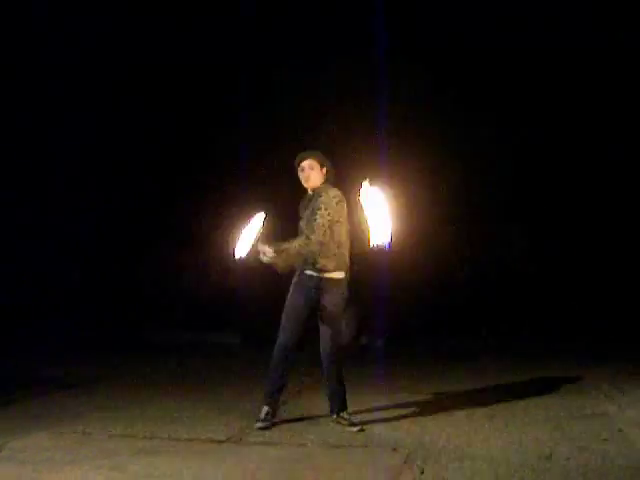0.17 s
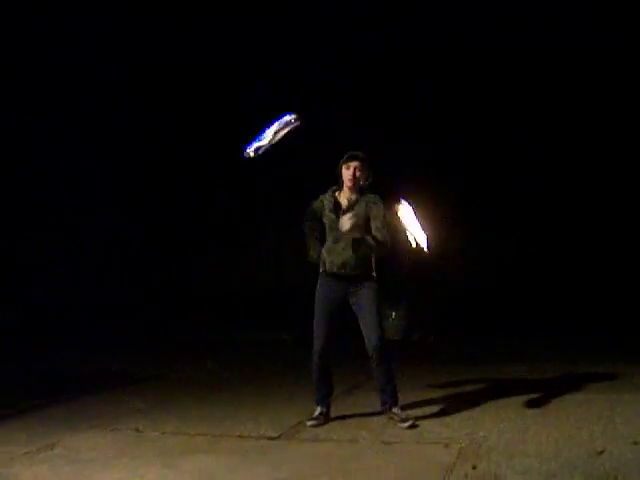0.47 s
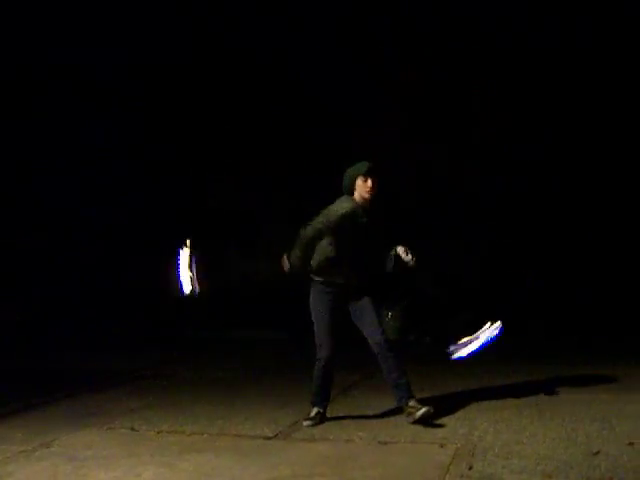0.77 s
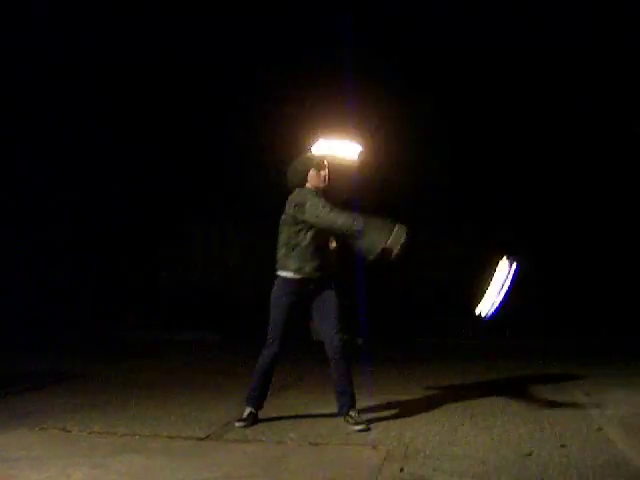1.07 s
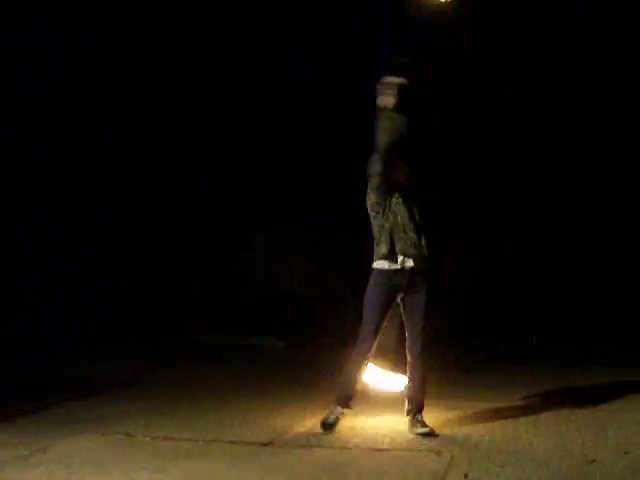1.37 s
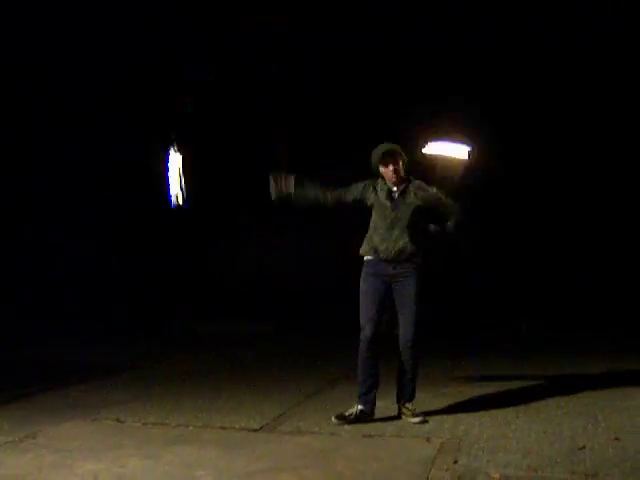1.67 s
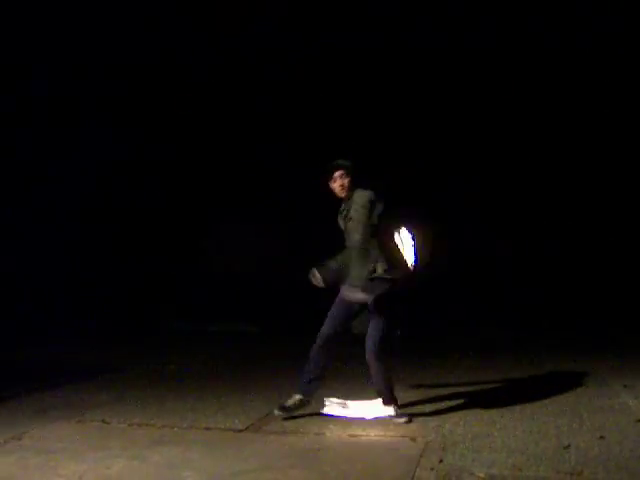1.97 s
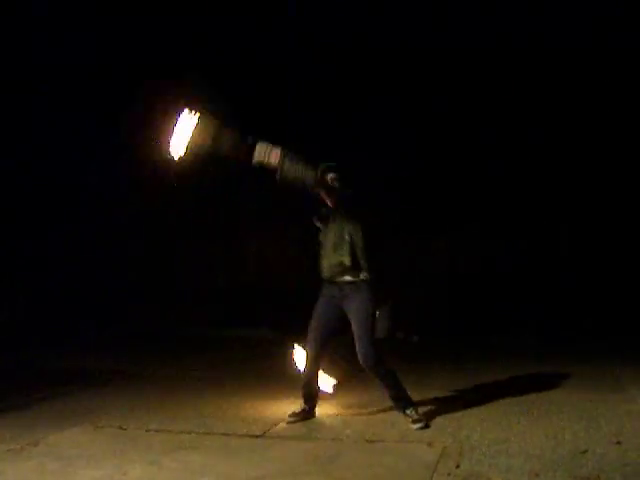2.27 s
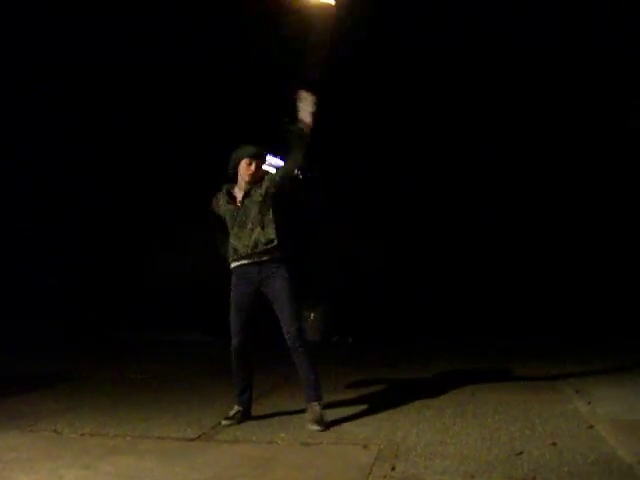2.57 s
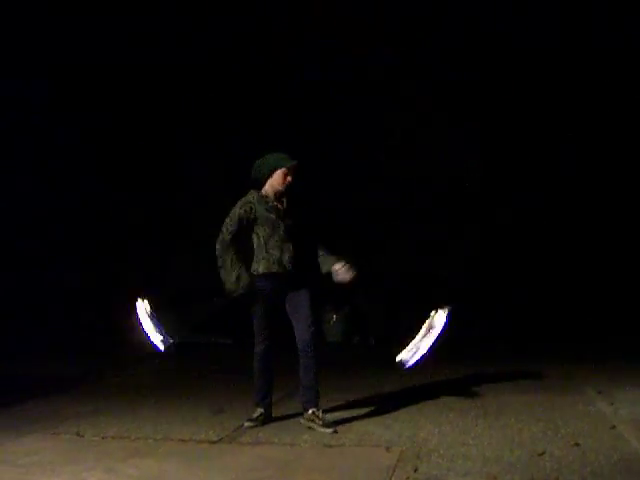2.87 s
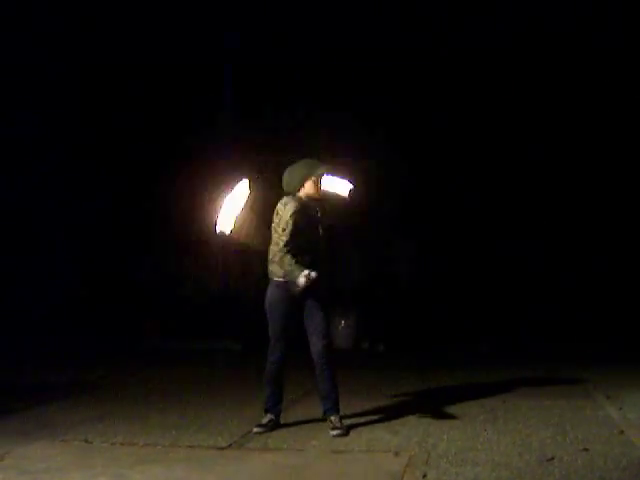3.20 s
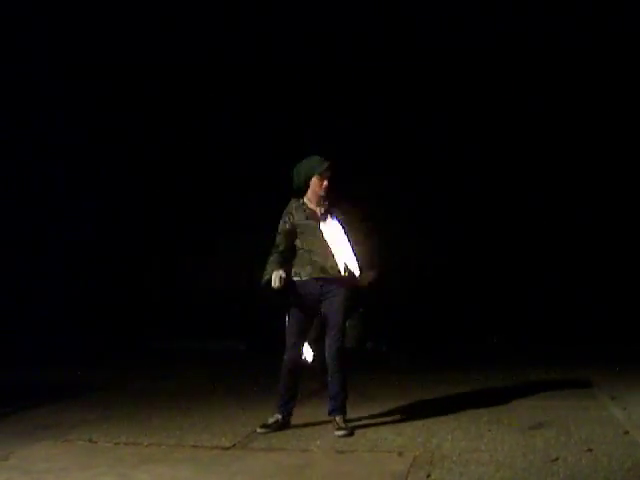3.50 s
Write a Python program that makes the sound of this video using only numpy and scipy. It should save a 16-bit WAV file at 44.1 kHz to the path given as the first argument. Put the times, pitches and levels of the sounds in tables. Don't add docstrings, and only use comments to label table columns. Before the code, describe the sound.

Burning poi swing in circles, flames roaring and whooshing in overlapping surges outdoors at night

```python
import sys
import numpy as np
from scipy import signal
from scipy.fft import rfft, irfft, next_fast_len
from scipy.io import wavfile
from scipy.ndimage import uniform_filter1d, map_coordinates

SR = 44100
rng = np.random.default_rng(int(sys.argv[2]) if len(sys.argv) > 2 else 0)


def elevation(decibels):
    levels = np.asarray(decibels, float)
    return 10 ** (levels / 20)


def bounce(signal):
    frames = np.transpose(np.atleast_2d(signal))
    limited = np.clip(frames, -1, 1)
    pcm = np.round(limited * 32767).astype(np.int16)
    wavfile.write(sys.argv[1], SR, pcm)


N = 160524
TIME = np.arange(N) / SR


def unit(x):
    return x / np.sqrt(np.mean(x ** 2) + 1e-20)


def along(points, hz):
    f, value = np.transpose(points)
    return np.interp(np.log(hz + 1), np.log(f + 1), value)


def wobble(rate):
    return map_coordinates(rng.standard_normal(N // 40), [TIME * rate + 2])


def filtered(x, response):
    size = next_fast_len(N + 8192)
    return irfft(rfft(x, size) * response(np.fft.rfftfreq(size, 1 / SR)), size)[..., :N]


def band(hz, width_hz):
    return lambda f: (1j * f * width_hz / (hz * hz - f * f + 1j * f * width_hz)) ** 2


def gate(start, length, edge):
    return np.clip(np.minimum(TIME - start, start + length - TIME) / edge, 0, 1)


def rush(spectrum, lumps, patchy_db):
    patches = signal.stft(rng.standard_normal(N) * lumps, nperseg=512)[2]
    field = uniform_filter1d(rng.standard_normal(patches.shape), size=6, axis=0)
    field = uniform_filter1d(field, size=10, axis=1)
    air = signal.istft(patches * elevation(patchy_db * unit(field)), nperseg=512)[1][:N]
    return unit(filtered(air, lambda hz: elevation(along(spectrum, hz))))


# frequency in Hz, density in dB per Hz.
NIGHT = [(15, -30), (25, -2), (60, -0.5), (300, -17), (800, -21), (5020, -46.5), (8000, -52.5), (9200, -89)]
# centre in Hz, width in Hz, level in dB.
DRONES = [
    (44, 15, -37.5),
    (139, 26, -33.5),
    (295, 14, -39),
    (750, 93, -46),
]
NIGHT_DB = -22.5


def night():
    drones = np.zeros(N)
    for hz, width_hz, db in DRONES:
        drones += elevation(db) * unit(filtered(rng.standard_normal(N), band(hz, width_hz)))
    drift, lumps = elevation(.4 * wobble(2.5)), elevation(.6 * wobble(9))
    return drift * (elevation(NIGHT_DB) * rush(NIGHT, lumps, patchy_db=0.58) + drones)


# start in seconds, length in seconds, level in dB.
CHIRPS = [
    (.0, .1, -59),
    (.37, .17, -56),
    (.78, .16, -54),
    (1.24, .18, -57),
    (1.65, .2, -56),
    (2.03, .1, -57),
    (2.4, .16, -56),
    (2.78, .2, -54),
    (3.12, .2, -56),
    (3.54, .12, -58),
]
WING_HZ, WING_WIDTH_HZ = 5050, 65
STROKE_RATE, STROKE_DEPTH = 55, .6


def cricket():
    wing = lambda f: np.exp(-((f - WING_HZ) / WING_WIDTH_HZ) ** 2)
    strokes = 1 + STROKE_DEPTH * np.sin(2 * np.pi * STROKE_RATE * TIME)
    song = sum(elevation(db) * gate(start, length, 0.021) for start, length, db in CHIRPS)
    return unit(filtered(rng.standard_normal(N), wing)) * strokes * song


# time in seconds, level in dB, centre in Hz, width in Hz.
TICK = (2.1275, -34, 3300, 2200)


def chain():
    start, db, hz, width_hz = TICK
    blow = np.zeros(N)
    blow[round(start * SR)] = 1
    return elevation(db) * unit(filtered(blow, band(hz, width_hz))) * np.sqrt(.002 * SR / N)


# start in seconds, length in seconds, level in dB, centre in Hz, width in Hz.
SCRAPES = [
    (1.058, .03, -38, 3200, 2500),
    (2.006, 0.0035, -38, 3600, 1000),
    (2.0235, .008, -32, 4000, 1100),
    (2.0235, .007, -35.5, 6300, 5000),
    (2.0315, .003, -38, 4500, 5000),
    (2.0335, .003, -34, 5500, 6000),
    (2.034, .013, -33.5, 3600, 2200),
    (2.026, .023, -32, 1700, 2000),
    (2.037, .01, -42, 6500, 4000),
    (2.048, .0045, -33.5, 5000, 8000),
]
GRIT_RATE, GRIT_SPREAD_DB = 2200, 3


def scrapes():
    out = np.zeros(N)
    for start, length, db, hz, width_hz in SCRAPES:
        chance, side, size = rng.random((3, N))
        clicks = (chance < GRIT_RATE / SR) * np.sign(side - .5)
        grit = clicks * elevation(-GRIT_SPREAD_DB * np.log(size + .05))
        burst = (grit + 0.63 * rng.standard_normal(N)) * gate(start, length, 0.00064)
        out += elevation(db) * unit(filtered(burst, band(hz, width_hz))) * np.sqrt(length * SR / N)
    return out


def puffs(rows, sharpness):
    out, noise = np.zeros(N), rng.standard_normal((len(rows), SR // 4))
    for (start, length, db, hz), air in zip(rows, noise):
        progress = np.clip(np.arange(len(air)) / SR / length, 0, 1)
        swell = np.sin(np.pi * progress) * air
        first = round(start * SR)
        burst = np.zeros(N)
        burst[first:][:len(air)] = swell[:N - first]
        out += elevation(db) * unit(filtered(burst, band(hz, hz / sharpness))) * np.sqrt(length * SR / N)
    return out


# start in seconds, length in seconds, level in dB, centre in Hz.
SPITS = [(.608, 0.0073, -31, 1340), (1.03, 0.012, -32.5, 1250), (1.055, 0.017, -29, 870),
         (1.06, 0.021, -33, 1970), (1.066, 0.013, -36, 2660), (1.075, 0.011, -34, 1630),
         (1.094, .012, -38, 2120), (1.101, .01, -37, 3000), (1.116, .012, -41, 1960),
         (1.128, 0.027, -31, 1140), (1.14, .016, -41, 2820), (1.654, 0.012, -44, 2070),
         (2.792, 0.0062, -37, 1970), (2.83, 0.012, -40, 2150), (2.867, 0.013, -30, 1350),
         (2.875, .012, -38, 3300), (2.877, 0.009, -34.5, 2000), (2.942, 0.0077, -42, 2500),
         (2.957, 0.0086, -43, 2650)]


def spits():
    return puffs(SPITS, sharpness=8.3)


# start in seconds, length in seconds, level in dB, centre in Hz.
WHIRLS = [(.17, 0.089, -31.5, 850), (.21, 0.041, -28, 295), (.32, 0.044, -23, 220), (.4, .08, -27.5, 127.5),
          (.52, 0.079, -34, 450), (.64, 0.078, -27, 139), (.78, .1, -26, 109.5), (1.12, 0.089, -26.5, 138),
          (1.24, .12, -25.5, 124.6), (1.35, 0.055, -30, 290), (2.0, .05, -22.5, 151),
          (.7, 0.095, -25.5, 235), (.74, .16, -28, 222), (.73, 0.18, -28, 310), (.8, 0.089, -25, 360),
          (.86, 0.079, -22.5, 200), (.93, 0.063, -25, 228), (1.28, 0.028, -26.5, 293),
          (1.48, 0.076, -33, 750), (1.73, 0.087, -29.5, 160), (1.83, 0.06, -29.5, 340),
          (1.95, 0.087, -26, 250), (2.245, 0.027, -25, 81.2), (2.265, 0.028, -26.5, 288),
          (2.305, 0.036, -24.5, 286), (2.78, 0.1, -34, 800), (2.86, 0.042, -26, 260),
          (2.85, 0.2, -27.5, 208), (2.87, 0.16, -29.5, 138), (2.95, 0.051, -21, 213),
          (3.23, 0.034, -21.5, 160), (3.23, 0.094, -33, 750), (3.31, 0.034, -22, 205),
          (3.4, 0.034, -19.5, 290), (3.5, 0.079, -28, 300)]


def whirls():
    return puffs(WHIRLS, sharpness=2.64)


def swing(rows):
    seconds, height = np.transpose(rows)
    turns = np.arange(len(seconds))
    place = np.interp(TIME, seconds, turns)
    eased = np.floor(place) + (1 - np.cos(np.pi * (place % 1))) / 2
    return np.interp(eased, turns, height)


# frequency in Hz, density in dB per Hz.
ROAR = [(40, -120), (90, -14.5), (170, 1), (300, 1), (400, -1.5), (520, -12.5), (900, -14), (2000, -120)]
BODY = [(200, -120), (450, -6), (850, -2.5), (1400, -8.5), (2500, -26.5), (6000, -120)]
HISS = [(500, -120), (1100, -15.5), (2000, -1.5), (4000, -8), (7000, -18), (8200, -17.5), (9100, -50)]
ROAR_DB, BODY_DB, HISS_DB = -30, -38.5, -42.5
ROAR_GROWS, BODY_GROWS, HISS_GROWS = 1.17, 0.79, 1.08
FLUTTER_DB, FLUTTER_RATE = 1.5, 13
TEAR_DB, TEAR_RATE = 1.5, 150
ECHO_MS_PER_M, GROUND_SHARE = 1.25, .8
BLUR_HZ = 3300
GRAZE_M = .3


def flame(path, speed, roar_db, hiss_db):
    height = swing(path)
    speed_db = np.interp(TIME, *np.transpose(speed))
    flap_db = FLUTTER_DB * wobble(FLUTTER_RATE)
    tear = elevation(TEAR_DB * wobble(TEAR_RATE))

    roar_level = elevation(ROAR_DB + roar_db + ROAR_GROWS * speed_db + flap_db)
    hiss_level = elevation(HISS_DB + hiss_db + HISS_GROWS * speed_db + 0.15 * flap_db)
    body_level = elevation(BODY_DB + BODY_GROWS * speed_db + 0.45 * flap_db)
    roar = roar_level * rush(ROAR, tear, patchy_db=1.5)
    hiss = hiss_level * rush(HISS, np.sqrt(tear), patchy_db=1.26)
    body = body_level * rush(BODY, np.sqrt(tear), patchy_db=2.0)
    direct = roar + body + hiss

    late = np.arange(N) - height * ECHO_MS_PER_M * SR / 1000
    echo = map_coordinates(direct, [late], mode="nearest")
    dull = filtered(echo, lambda hz: 1 / (1 + (hz / BLUR_HZ) ** 2))
    sharp = np.exp(-(height / GRAZE_M) ** 2)
    return direct + GROUND_SHARE * (sharp * echo + (1 - sharp) * dull)


# time in seconds, height in metres.
TIGHT = [(-.15, .5), (.1, 1.25), (.26, .5), (.58, 1.2), (.84, .4), (1.15, 1.2), (1.36, .25), (1.6, 1.36),
         (1.87, .4), (2.1, 1.3), (2.31, .35), (2.64, 1.4), (2.94, .25), (3.13, 1.3), (3.3, .45),
         (3.66, 1.1)]
# time in seconds, speed in dB.
TIGHT_SPEED = [(0, 3.5), (.13, -8.5), (.25, 4.5), (.5, -2), (.72, 2.5), (0.87, 0.5), (1.12, 1), (1.29, 3.5),
               (1.62, -4), (1.769, 6), (2.0, 2), (2.15, -12), (2.311, -8.5), (2.43, -2), (2.76, -3.5),
               (2.93, 0), (3.14, -7), (3.261, 2.5), (3.64, -1.5)]


def tight_flame():
    return flame(TIGHT, TIGHT_SPEED, roar_db=-1.5, hiss_db=-4.0)


# time in seconds, height in metres.
WIDE = [(-.1, 1.5), (.08, 1.7), (.31, .38), (.55, 1.92), (.95, .16), (1.43, 2.48), (2.0, .12), (2.55, 2.4),
        (2.99, .3), (3.15, 1.56), (3.39, .15), (3.63, 1.6)]
# time in seconds, speed in dB.
WIDE_SPEED = [(0, -2.5), (.1, -3), (.2, 3.5), (.5, 0.5), (.85, 3.5), (1.0, 1), (1.079, 2.5), (1.2, -2.5),
              (1.45, -1.5), (1.7, 2), (1.98, 3), (2.1, -3.5), (2.451, -7.5), (2.85, 4), (3.0, 2),
              (3.139, -4), (3.48, 2), (3.64, -8.5)]


def wide_flame():
    return flame(WIDE, WIDE_SPEED, roar_db=-2.0, hiss_db=1.5)


def scene():
    background = night() + cricket()
    contacts = chain() + scrapes()
    fire = spits() + whirls() + tight_flame() + wide_flame()
    return (background + contacts + fire)[None]


def band_limit(x):
    return signal.sosfilt(signal.butter(12, 8980, fs=SR, output="sos"), x)


# frequency in Hz, gain in dB.
MIC = [(20, -7), (60, -1.5), (7000, -1), (8000, -10.5), (8600, -10.5), (9100, -44)]


def record(dry):
    mix = filtered(dry, lambda hz: elevation(along(MIC, hz)))
    return band_limit(mix)


dry = scene()
out = record(dry)
bounce(out)
```